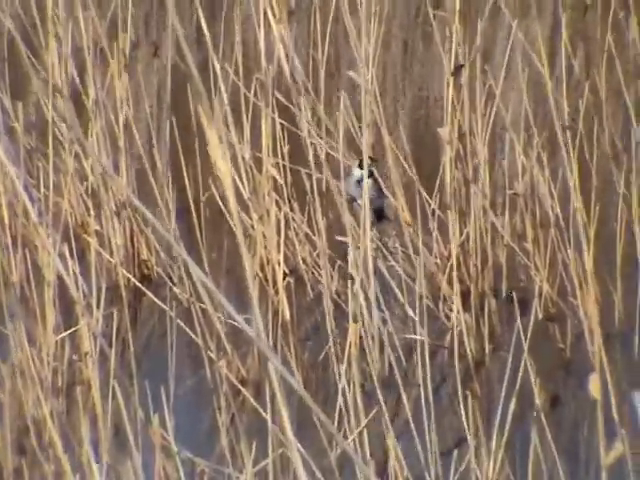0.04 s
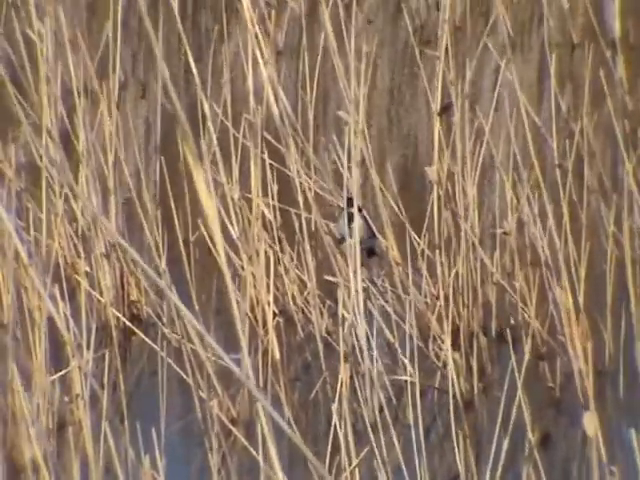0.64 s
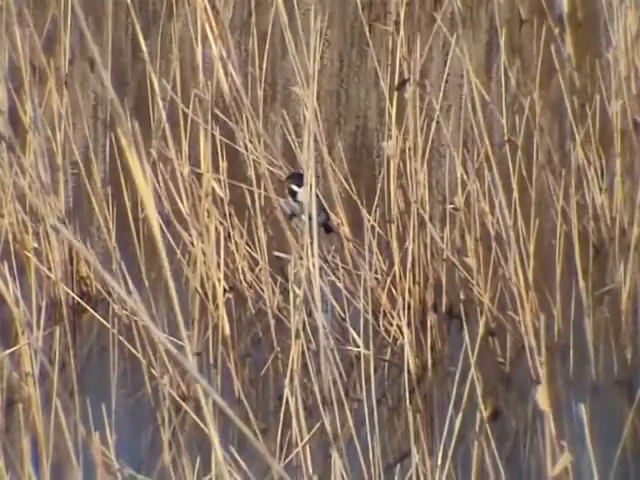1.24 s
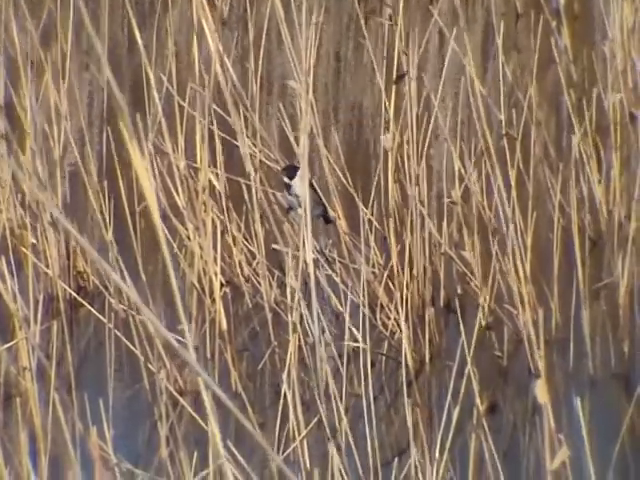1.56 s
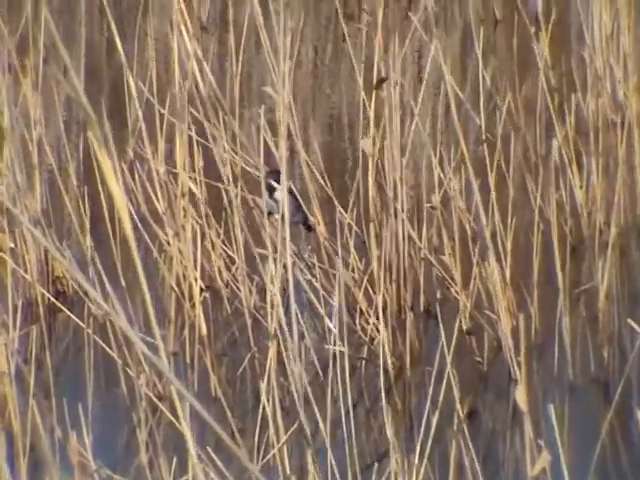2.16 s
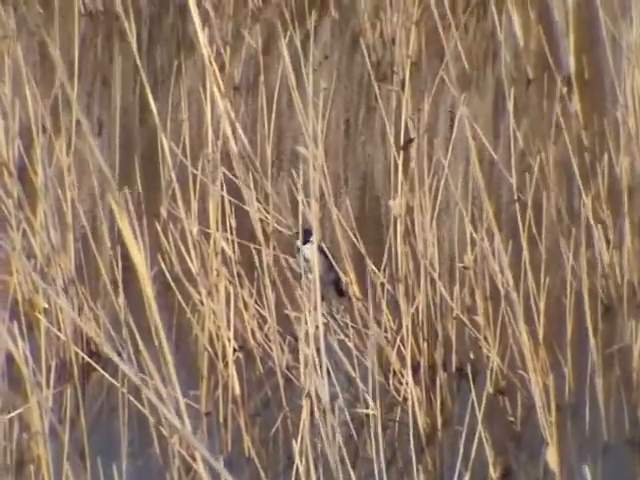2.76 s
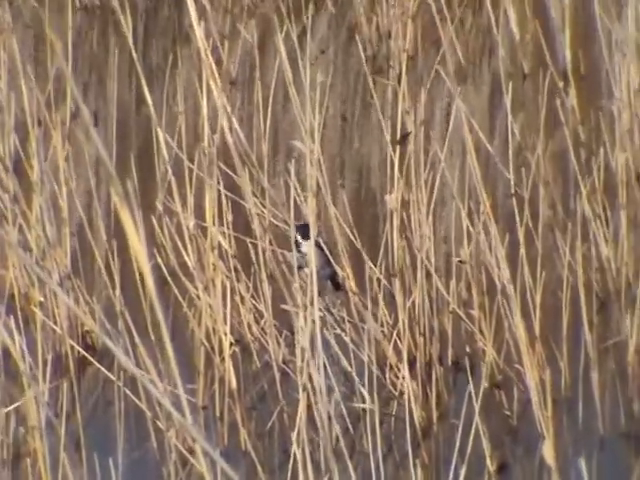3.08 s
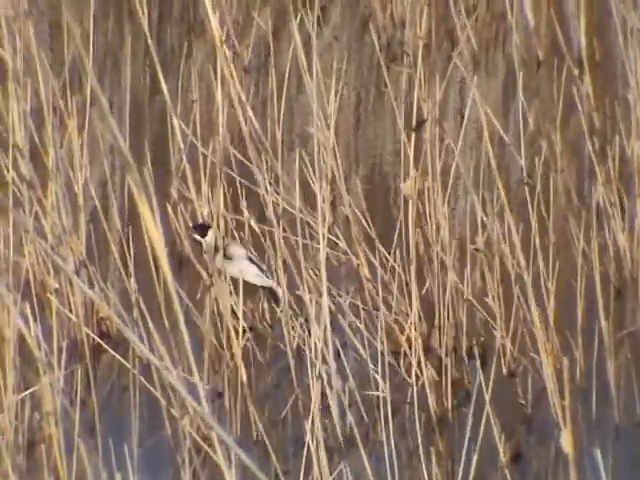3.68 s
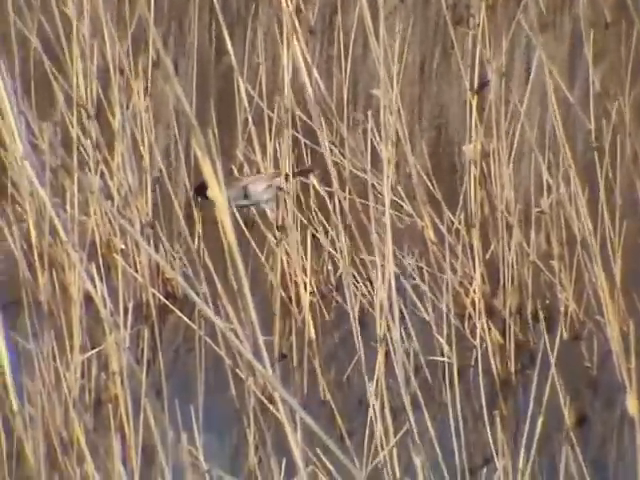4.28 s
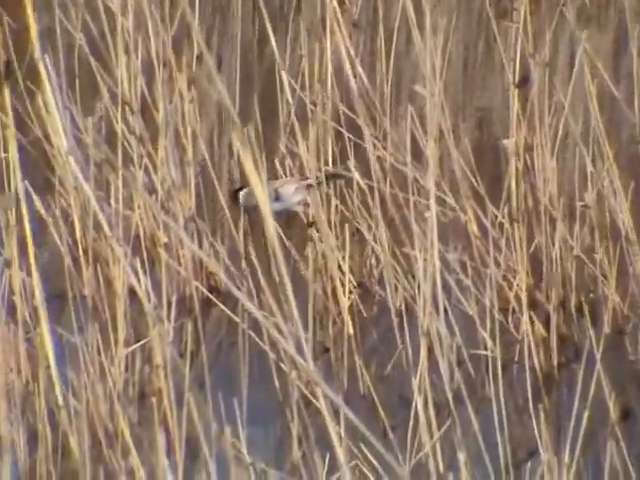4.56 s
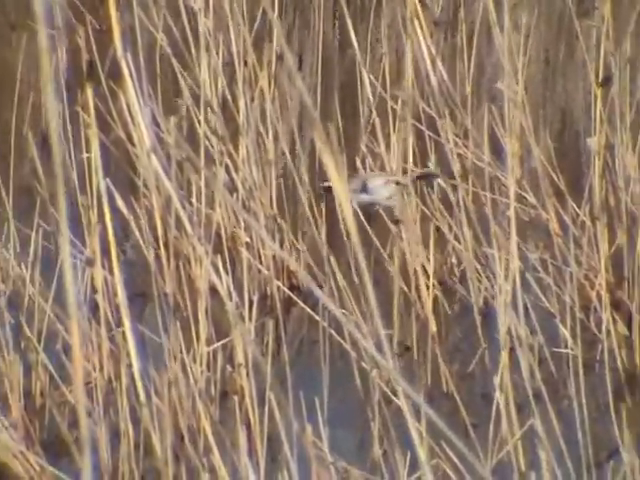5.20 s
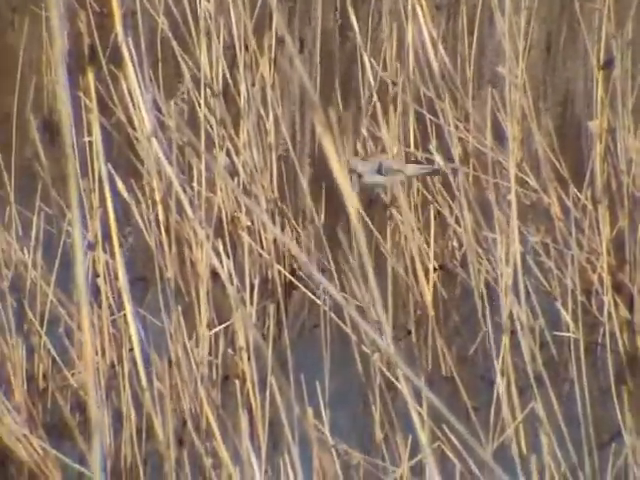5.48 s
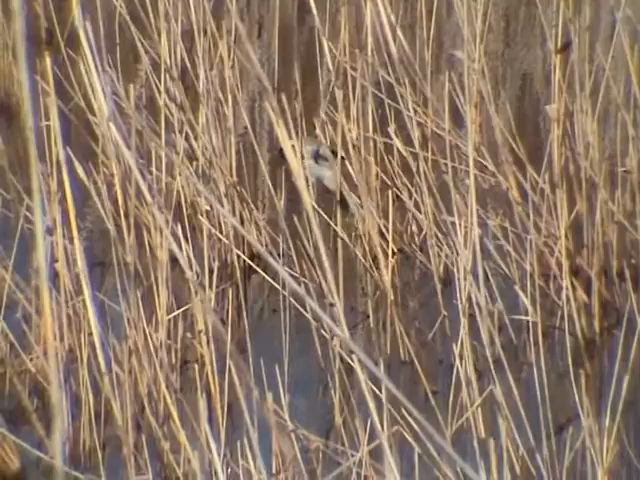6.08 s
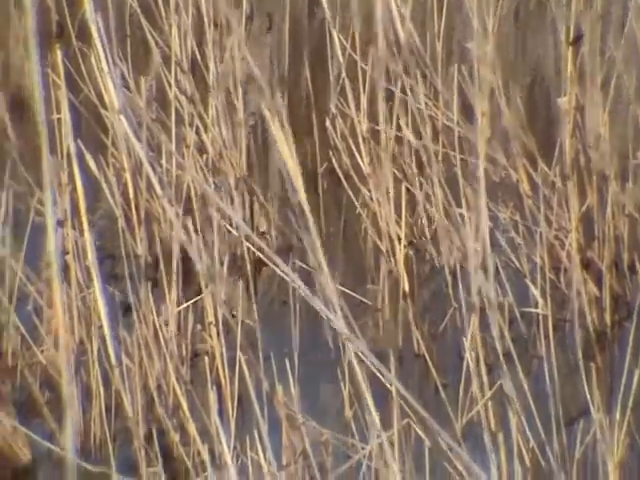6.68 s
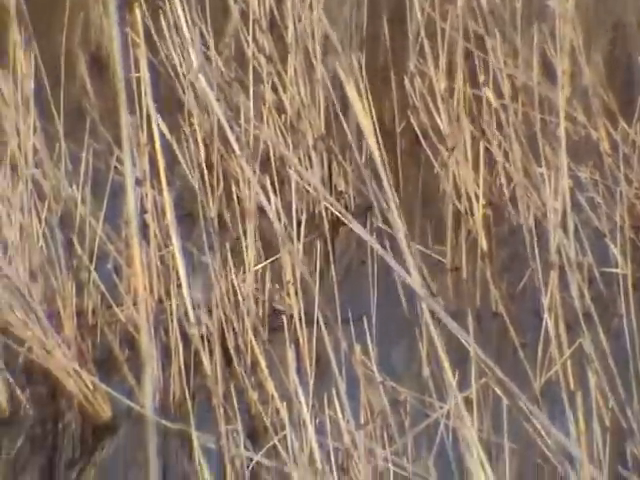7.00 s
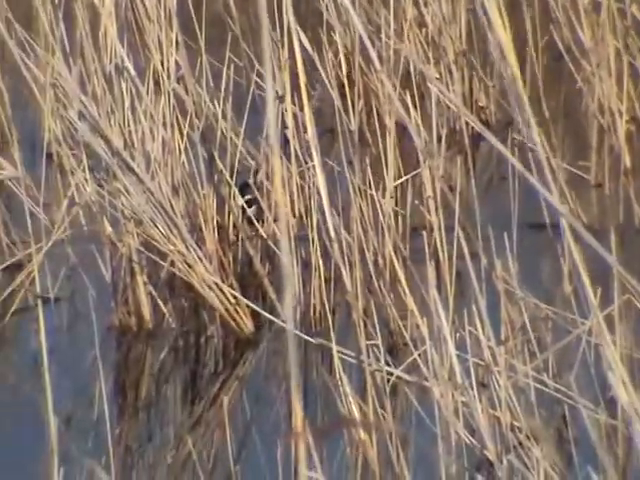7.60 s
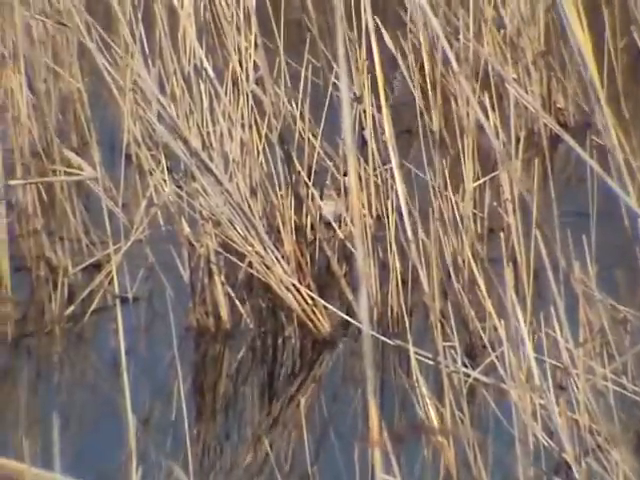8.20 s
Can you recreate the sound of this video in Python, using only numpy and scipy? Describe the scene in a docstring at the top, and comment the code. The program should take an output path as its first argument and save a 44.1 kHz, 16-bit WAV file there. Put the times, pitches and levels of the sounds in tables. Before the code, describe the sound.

Over a faint outdoor hush with a thin camera whine, a small bird in a reed bed sings one short phrase of quick, high, sliding chirps. Light gusts rumble on the microphone beneath it. After the song come a few soft handling ticks and faint dry rustles. Then the wind hits harder, buffeting the microphone with a deep rumble and small pops before it eases off.

```python
"""First comes a faint outdoor hush, with the hiss and thin whine of a camera. Then a small bird in
a reed bed sings one short phrase of thin, arched whistles, each a sliding tone echoed by the stems.
Gusts rumble on the microphone's openings, hardest after the song, and little swirls of air burst
there as pops. Now and then a sleeve swishes, the camera ticks in the hand and dry reeds rustle."""
import sys
import numpy as np
from scipy import signal
from scipy.io import wavfile
from scipy.ndimage import uniform_filter1d

SR = 44100
rng = np.random.default_rng(int(sys.argv[2]) if len(sys.argv) > 2 else 0)


def inscribe(sig):
    """Save sig as 16-bit PCM at rate SR to the path in sys.argv[1].

    A 1-D sig is mono; a 2-D sig holds one channel per row.
    Samples are clipped to [-1, 1] before scaling.
    """
    pcm = np.round(np.clip(np.atleast_2d(sig).T, -1, 1) * 32767)
    wavfile.write(sys.argv[1], SR, pcm.astype(np.int16))


N = 372644
TIME = np.arange(N) / SR

# "Pan" is left level minus right level. "Likeness" is 1 when both sides match, -1 when opposite.
# Each note slides to a turning point and on from it: (turn time [s], lead-in [s], lead-out [s],
# first pitch [Hz], turning pitch [Hz], last pitch [Hz], relative level [dB], turn roundness [0-1])
NOTES = [(.941, 0.0012, 0.011, 6260, 5960, 2100, -7, 0.5), (0.96, 0.009, 0.013, 2300, 3550, 2200, 2.5, .3),
         (1.006, 0.021, 0.012, 2240, 4100, 4030, 0, .4), (1.533, .018, 0.01, 3550, 3830, 4000, -19, .05),
         (1.647, .001, .008, 5800, 5750, 2300, -10, .4), (1.666, 0.0083, 0.013, 2280, 3580, 2010, 4, .3),
         (1.715, 0.028, 0.01, 1920, 3980, 4150, 3.5, 0.36),
         (1.834, 0.0011, 0.0088, 5800, 5760, 2300, -12, .4), (1.855, 0.013, 0.013, 2250, 3630, 2070, 2, .3),
         (1.901, 0.021, 0.012, 2180, 4140, 3800, 3, 0.7), (1.999, 0.018, 0.0117, 2160, 3600, 2200, 1, .35),
         (2.108, 0.021, 0.017, 5100, 7200, 5360, 2.5, 0.22),
         (2.124, 0.0019, 0.029, 5500, 5150, 1500, 2.5, 0.04),
         (2.269, 0.043, 0.035, 2160, 4550, 2020, 0, 0.18),
         (2.412, 0.022, 0.016, 6800, 7200, 4870, -0.5, 0.4), (2.437, 0.014, 0.024, 4980, 3800, 1520, 0, 0),
         (2.76, .022, .022, 2560, 2520, 2440, -9, .4), (3.324, 0.00079, .028, 9100, 9100, 7900, -2, .4)]
# The bird's throat rings near 4 kHz, so loudness follows pitch: (pitch [Hz], base level [dB])
THROAT = [(1500, -65), (2300, -57), (2850, -49), (3600, -48.5), (4100, -39.5), (4700, -43.5), (5400, -55),
          (6500, -49), (7300, -59), (9000, -57)]
# Where the bird sits between the ears: (pitch [Hz], pan [dB])
BIRD_PAN = [(2900, -3), (4000, -6), (7000, -2)]

# Gusts press on both microphone openings, sway between them and shed small swirls. A head-on gust
# has "bite": it is brighter. (peak time [s], rise [s], hold [s], fall [s], press [dB], sway [dB],
# swirls [dB], bite [dB per octave])
GUSTS = [(1.7, 0.046, 0.028, 0.091, -38, -26, -60, -8), (1.803, 0.077, 0.084, 0.077, -34, -26, -59.5, -3.5),
         (2.093, 0.057, 0.018, 0.063, -40.5, -34, -71, 1),
         (2.522, 0.035, 0.016, 0.085, -33, -25.5, -73, -7.5),
         (2.596, 0.034, 0.051, 0.1, -31, -28.5, -70, 2.7), (2.93, 0.043, 0.033, 0.14, -31, -31.5, -53.5, 1),
         (3.567, 0.037, 0.014, 0.057, -34, -32, -72, 0), (4.827, 0.11, 0.11, 0.27, -31.5, -28, -51.5, 0.5),
         (5.09, 0.1, 0.11, 0.093, -31.5, -31.5, -52.5, 2),
         (5.274, 0.065, 0.063, 0.11, -22, -34, -43.5, -0.5),
         (5.367, 0.04, 0.081, 0.13, -19.5, -31, -36.5, -0.5),
         (5.549, 0.12, 0.03, 0.064, -20.5, -31, -28.5, 5),
         (5.674, 0.092, 0.16, 0.088, -23.5, -35, -45, 0.5), (5.819, 0.15, 0.11, 0.017, -19, -34, -32.5, 0),
         (6.04, 0.25, 0.044, 0.17, -22.5, -32, -43, -0.2), (6.168, 0.13, 0.11, 0.21, -23, -34.5, -44, 1),
         (6.725, 0.12, 0.015, 0.045, -30.5, -39, -50, -1.5),
         (6.84, 0.039, 0.11, 0.15, -25.5, -36.5, -42.5, 0),
         (7.022, 0.079, 0.064, 0.057, -22, -33, -34.5, 4.5),
         (7.416, 0.031, 0.022, 0.33, -42.5, -54, -67, -2), (7.915, 0.2, 0.037, 0.087, -45.5, -51, -79, 3),
         (8.102, 0.09, 0.016, 0.071, -30, -33, -56, -2), (8.223, 0.1, 0.063, 0.15, -37, -38, -81, -1.5)]
# The light breeze between gusts: (time [s], sway [dB])
BREEZE = [(0, -75), (.5, -76), (.59, -42), (1, -45), (1.65, -43), (2.3, -46), (3.4, -81), (4.6, -51),
          (6.5, -60), (7.3, -96), (8.45, -58)]
# The wind's deep rumble: (frequency [Hz], relative level [dB])
RUMBLE = [(20, 1.5), (35, -1.5), (52, 5), (100, 2.5), (165, -0.5), (230, -8.5), (320, -16.5), (450, -29),
          (600, -28.5)]
# How closely press and sway move together: (frequency [Hz], likeness [-1 to 1])
SWAY_LIKENESS = [(40, 0.52), (150, 0.53), (400, 0.78)]
# The higher flutter of small swirls: (frequency [Hz], relative level [dB])
FLUTTER = [(280, 4.5), (400, -12.5), (600, -9), (900, -15), (1300, -26.5), (1900, -32.5), (2800, -42.5)]
# How alike the flutter is left and right: (frequency [Hz], likeness [-1 to 1])
FLUTTER_LIKENESS = [(290, 0.72), (640, -1), (1400, 0.023)]
# Swirls bursting on an opening: (time [s], relative peak [dB], ring [Hz], pan [dB])
POPS = [(0.619, -34.5, 353, 4), (1.111, -27, 196, 3), (2.634, -19, 172, 17), (2.651, -26, 297, 5),
        (2.678, -23, 252, -9), (2.932, -29, 270, 15), (2.954, -24, 168, 5), (3.232, -34, 60.6, 7),
        (3.584, -27.5, 124, 5), (3.789, -36, 54, 15), (4.14, -37, 224, 20), (5.105, -26.5, 850, 8),
        (5.275, -21, 380, 13), (5.301, -25, 477, 25), (5.334, -14, 150, 4), (5.372, -10.5, 302, 2),
        (5.47, -31, 850, 18), (5.503, -30, 750, 22), (5.521, -24, 1620, 10), (5.543, -23, 480, 16),
        (5.556, -26, 760, 11), (5.56, -7, 288, -2), (5.564, -20.5, 1160, 12), (5.576, -33, 1050, 10),
        (5.59, -25, 990, 10), (5.731, -17, 360, 15), (5.758, -16.5, 710, 10), (5.761, -24, 560, 10),
        (5.804, -16.5, 515, 23), (5.826, -15.5, 540, 17), (5.834, -28, 1050, 13), (5.88, -21, 805, 27.5),
        (5.926, -13, 396, 17), (5.932, -11.5, 335, 6), (5.973, -30.5, 594, 29), (6.06, -8, 142, -3),
        (6.123, -18.5, 805, 21), (6.288, -28.5, 696, 23), (6.305, -25, 416, 16), (6.422, -17, 100, 3),
        (6.713, -24.5, 400, 14), (6.852, -18, 128, 0), (6.903, -29, 545, 26), (7.044, -6.5, 189, -4),
        (7.064, -22, 820, 32), (7.085, -29, 720, 14), (7.122, -16, 190, 7), (8.113, -31.5, 320, 23)]

# Dry ticks of the camera in the hand: (time [s], peak [dB], decay [s])
TICKS = [(3.158, -38, .003), (3.913, -35.5, .004), (3.937, -41, .009)]
# How the camera's shell rings: (frequency [Hz], width [Hz], relative level [dB])
SHELL = [(400, 220, 0), (1020, 280, -4), (1900, 600, -16)]
# Rustles of dry stems and cloth: (time [s], length [s], centre [Hz], level [dB], pan [dB])
RUSTLES = [(0.618, 0.05, 586, -64, 15), (1.168, 0.15, 4000, -62.5, 9), (1.17, 0.19, 590, -59.5, 10),
           (1.399, 0.026, 420, -52.5, 7), (3.55, 0.028, 2400, -56.5, 9), (3.675, 0.023, 1900, -65, 2),
           (4.732, 0.027, 1660, -61.5, -8), (4.872, 0.024, 1870, -56.5, 4), (4.91, 0.15, 5130, -62, -2),
           (5.136, 0.0071, 2340, -57, 15), (6.838, 0.02, 2650, -56, 3)]
# A sleeve slides: (time [s], rate of passing cloth ribs [Hz], level [dB])
SLEEVE = [(1.32, 1100, -61), (1.34, 1497, -58), (1.36, 1950, -57), (1.38, 2193, -55), (1.41, 1990, -58),
          (1.445, 1340, -61)]

# Still air and microphone hiss: (frequency [Hz], relative level [dB])
HUSH = [(22, -12.5), (42, -22.5), (80, -26.5), (150, -15.5), (280, -16), (450, -18.5), (720, -20.5),
        (1050, -16.5), (1550, -22.5), (2800, -23.5), (3700, -26.5), (6300, -32.5), (8200, -32.5),
        (11000, -30), (13800, -43), (15500, -44)]
# How alike the hush is left and right: (frequency [Hz], likeness [-1 to 1])
HUSH_LIKENESS = [(60, 0.84), (290, 0.54), (640, 0.63), (1300, -0.7), (3100, 0.34), (6800, -0.54),
                 (15000, 0.96)]
# Which way the hush and hums lean: (frequency [Hz], pan [dB])
HUSH_PAN = [(60, 51.5), (200, -1), (700, 4.5), (1300, 1.5), (2400, 0.5), (8000, -1), (15000, 3)]
# The camera's noisy hums: (frequency [Hz], width [Hz], base level [dB])
HUMS = [(580.4, 5.8, -67.5), (895, 230, -63), (1154, 29, -76), (2676, 230, -70.5), (4860, 1740, -63.5),
        (6280, 450, -82)]
# The camera's thin tones: (frequency [Hz], relative level [dB])
WHINE = [(2170, -80), (2272, -74), (2503, -79), (2659, -75), (2842, -71.5), (3130, -81), (3400, -81),
         (4549, -78), (4657, -74), (4850, -80), (5115, -74), (5131, -72), (5324, -80), (6250, -71.5),
         (6455, -79), (9092, -79), (9442, -76), (9744, -81), (10767, -79.5)]
# Overtones of the camera's electronic switching: (frequency [Hz], base level [dB])
BUZZ_OVERTONES = [(3900, -88), (4200, -78), (4500, -72.5), (4800, -73), (5400, -79), (5700, -88),
                  (6000, -78.5), (6300, -78.5), (6600, -87), (8100, -85), (8700, -78), (9300, -76),
                  (9900, -88), (10500, -88), (10800, -76.5), (11700, -79), (12900, -77.5), (13800, -80.5),
                  (14400, -93)]
# That buzz swells twice: (time [s], relative level [dB])
BUZZ_SWELLS = [(0, -9), (.6, -9), (1.05, -3), (2.55, -1), (2.9, -7), (5.2, -9), (5.65, -0.5), (6.6, -0.5),
               (6.85, 1.5), (7.45, -7), (8.45, -9)]

SWITCHING_HZ, CUTOFF_HZ = 300, 15750


def bird(waver=0.0033, rasp_below_hz=3200, rasp_per_octave=0.09, dip_hz=3470, dip_width_hz=380):
    """A nearly pure whistle slides through each note, dipping at a narrow pitch gap in the sound path."""
    direct, wobble = np.zeros((2, N)), drift(245)
    song, rasp = np.zeros(N), drift(900)
    rise_s, fall_s = 0.002, 0.0022
    for s, lead_in_s, lead_out_s, first_hz, turn_hz, last_hz, note_db, roundness in NOTES:
        now = (TIME > s - lead_in_s) & (TIME < s + lead_out_s)
        t = TIME[now] - s
        pitch = glide(t, lead_in_s, lead_out_s, first_hz, turn_hz, last_hz, roundness)
        # the low ends of a note break up into a rasp
        roughness = rasp_per_octave * np.maximum(0, np.log2(rasp_below_hz / pitch))
        pitch = pitch * (1 + waver * wobble[now] + roughness * rasp[now])
        fade = np.clip(np.minimum((t + lead_in_s) / rise_s, (lead_out_s - t) / fall_s), 0, 1)
        dip = 1 - np.exp(-((pitch - dip_hz) / (dip_width_hz / 2)) ** 2)
        loudness = from_db(at_hz(THROAT, pitch) + note_db) * fade * dip
        whistle = loudness * np.sin(2 * np.pi * np.cumsum(pitch) / SR)
        song[now] += whistle
        direct[:, now] += panned(whistle, at_hz(BIRD_PAN, pitch))
    return direct + reed_echoes(song)


def glide(t, lead_in_s, lead_out_s, first_hz, turn_hz, last_hz, roundness):
    """A note's pitch slides evenly on either side of a rounded turn at t = 0."""
    progress = t / np.where(t < 0, lead_in_s, lead_out_s)
    bend = (np.hypot(progress, roundness) - roundness) / (np.hypot(1, roundness) - roundness)
    return turn_hz * (np.where(t < 0, first_hz, last_hz) / turn_hz) ** bend


def reed_echoes(song, echo_db=-9, decay_s=0.015, count=40):
    """The stems scatter many weak echoes, different ones to each side."""
    out = np.zeros((2, N))
    delays_s, signs = rng.uniform(0.005, 0.11, count), rng.choice([-1, 1], count)
    for k, (delay, sign) in enumerate(zip(delays_s, signs)):
        lag = int(delay * SR)
        out[k % 2, lag:] += sign * from_db(echo_db) * np.exp(-delay / decay_s) * song[:N - lag]
    return out


def wind(right_lag_s=0.00023):
    """Air tumbles over the microphone's openings, reaching the right one a little later."""
    press_db, sway_db, swirl_db, bite = airflow()
    left, right = rumble(press_db, sway_db, bite) + flutter(swirl_db)
    return np.array([left, np.interp(TIME - right_lag_s, TIME, right)])


def airflow(fade_db=15.5, swirl_speed=1.42, breeze_press_db=-54, breeze_bite=3):
    """Gusts swell, hold and die away over the breeze; gives press, sway, swirls and bite over time."""
    t = TIME[::50]
    s, rise, hold, fall, press_db, sway_db, swirl_db, gust_bite = np.transpose(GUSTS)[:, :, None]
    shape_db = -fade_db * np.maximum(0, np.maximum((s - t) / rise, (t - s - hold) / fall))
    gust_power, breeze_power = from_db(press_db + shape_db) ** 2, from_db(breeze_press_db) ** 2
    press = gust_power.sum(axis=0) + breeze_power
    breeze_sway = from_db(np.interp(t, *np.transpose(BREEZE))) ** 2
    sway = (from_db(sway_db + shape_db) ** 2).sum(axis=0) + breeze_sway
    # swirls come and go faster than their gust
    swirls = (from_db(swirl_db + swirl_speed * shape_db) ** 2).sum(axis=0) + 1e-12
    bite = ((gust_power * gust_bite).sum(axis=0) + breeze_power * breeze_bite) / press
    levels_db = 10 * np.log10([press, sway, swirls])
    return [np.interp(TIME, t, curve) for curve in (*levels_db, bite)]


def rumble(press_db, sway_db, bite, strong_db=-22, lumpy_db=2.5):
    """A stronger gust sheds smaller swirls, so its rumble is brighter as well as louder."""
    press_tilt = 0.33 * (press_db - strong_db) + bite   # dB per octave
    sway_tilt = 0.37 * (press_db - strong_db) + bite
    press, sway = 0, 0
    for hz, band in noise_bands(RUMBLE, SWAY_LIKENESS, 20.7, 608, count=12):
        press += band[0] * from_db(press_tilt * np.log2(np.clip(hz, 70, 400) / 70))
        sway += band[1] * from_db(sway_tilt * np.log2(max(hz, 45) / 45))
    lumps_db = lumpy_db * drift(35)
    press = steady(press) * from_db(press_db + lumps_db)
    sway = steady(sway) * from_db(sway_db + lumps_db)
    # the two add up on the left, which faces the wind, and partly cancel on the right
    return np.array([press + sway, press - sway])


def flutter(swirl_db, gain_db=1, strong_db=-22, ragged_db=7.5):
    """Small swirls come in ragged clumps and sound brighter when they are strong."""
    tilt = 0.3 * (swirl_db - strong_db)   # dB per octave
    bands = noise_bands(FLUTTER, FLUTTER_LIKENESS, 266, 3110, count=7)
    noise = sum(band * from_db(tilt * np.log2(hz / 400)) for hz, band in bands)
    clumps = rms_one(from_db(ragged_db * np.clip([drift(85), drift(76)], -2, 2)))
    return panned(noise * clumps * from_db(swirl_db + gain_db), pan_db=8.5)


def pops(gain_db=-6.5):
    """A bursting swirl is one kick of pressure that rings for about one cycle."""
    out, kick = np.zeros((2, N)), signal.unit_impulse(SR // 20)
    for s, peak_db, hz, pan_db in POPS:
        treble_cut = signal.butter(6, 1.253 * hz, fs=SR, output="sos")
        pulse = signal.sosfilt(treble_cut, resonate(kick, hz, width_hz=hz))
        pop = pulse / np.abs(pulse).max() * from_db(peak_db + gain_db) * rng.choice([-1, 1])
        at = int(s * SR)
        out[:, at:at + len(pop)] += panned(pop, pan_db)
    return out


def camera_ticks():
    """A tick is a sudden, short scuff that rings briefly in the camera's shell."""
    out, t = np.zeros((2, N)), TIME[:SR // 20]
    for s, peak_db, decay_s in TICKS:
        scuff = rng.standard_normal(len(t)) * np.exp(-t / decay_s)
        tick = sum(from_db(db) * rms_one(resonate(scuff, hz, width)) for hz, width, db in SHELL)
        at = int(s * SR)
        out[:, at:at + len(t)] += tick / np.abs(tick).max() * from_db(peak_db)
    return out


def rustles(width=0.45, grain_db=1.5):
    """Dry stems and cloth rub, making short swells of grainy noise."""
    out, friction = 0, rng.standard_normal(N) * from_db(grain_db * drift(130))
    for s, length_s, hz, level_db, pan_db in RUSTLES:
        scrape = rms_one(resonate(resonate(friction, hz, width * hz), hz, width * hz))
        swell = from_db(level_db) / (1 + (2 * (TIME - s) / length_s) ** 4)
        out += panned(scrape * swell, pan_db)
    return out


def sleeve(uneven=0.09, octave_below_db=-5, fade_s=0.019):
    """Ribs of cloth tick past unevenly, so the swish rises and falls with the arm's speed."""
    rate_hz, level_db = in_time(SLEEVE)
    phase = 2 * np.pi * np.cumsum(rate_hz * (1 + uneven * drift(670))) / SR
    ribs = np.sin(phase) + from_db(octave_below_db) * np.sin(phase / 2)
    swish = rms_one(ribs * drift(280))
    fade = np.clip(np.minimum(TIME - SLEEVE[0][0], SLEEVE[-1][0] - TIME) / fade_s + 0.5, 0, 1)
    return panned(swish * from_db(level_db) * fade, pan_db=13.5)


def background():
    """The camera's whine, its hums and the hiss all swell a little with its buzz."""
    buzz_db, = in_time(BUZZ_SWELLS)
    swell_db = 0.12 * (buzz_db - buzz_db.mean())
    return whine() * from_db(swell_db) + buzz(buzz_db) + hush(swell_db) + hums(swell_db)


def whine(gain_db=-0.5, waver_db=1.5, spread_db=3):
    """The camera's electronics give thin, steady tones, each wavering a little."""
    out, wobbles = np.zeros((2, N)), [drift(2.4) for _ in range(8)]
    for hz, tone_db in WHINE:
        for_phase, for_level = rng.choice(len(wobbles), size=2, replace=False)
        phase = 2 * np.pi * (hz * TIME + rng.random()) + 0.5 * wobbles[for_phase]
        side_shift = rng.normal(0, 0.041, (2, 1))
        gain = np.sqrt(2) * from_db(tone_db + gain_db + waver_db * wobbles[for_level])
        out += panned(gain * np.sin(phase + side_shift), rng.normal(0, spread_db))
    return out


def buzz(buzz_db, uneven_db=2):
    """The camera's switching gives a fine buzz of sharp, uneven ticks that swells and fades."""
    ticks = sum(np.sqrt(2) * from_db(at_hz(BUZZ_OVERTONES, hz)) * np.cos(2 * np.pi * hz * TIME)
                for hz in np.arange(BUZZ_OVERTONES[0][0], CUTOFF_HZ, SWITCHING_HZ))
    tick_number = np.round(TIME * SWITCHING_HZ).astype(int)
    strength = from_db(uneven_db * np.clip(rng.standard_normal(tick_number[-1] + 1), -2, 2))
    return panned(ticks * (strength / strength.mean())[tick_number] * from_db(buzz_db), pan_db=3)


def hums(swell_db):
    """The camera hums: noise that rings around a few pitches, mostly alike on both sides."""
    out, noise = 0, rng.standard_normal(N) + 0.57 * rng.standard_normal((2, N))
    for hz, width_hz, level_db in HUMS:
        gain = from_db(level_db + swell_db * min(hz / 5000, 1))
        out += panned(gain * rms_one(resonate(noise, hz, width_hz)), at_hz(HUSH_PAN, hz))
    return out


def hush(swell_db, base_db=-54.4, patchy_db=0.6):
    """Still air and microphone hiss make a soft noise whose bands each drift in level."""
    out = 0
    for hz, band in noise_bands(HUSH, HUSH_LIKENESS, 19.8, 16040, count=32):
        level_db = base_db + patchy_db * drift(3.5) + swell_db * min(hz / 10000, 1)
        out += panned(band, at_hz(HUSH_PAN, hz)) * from_db(level_db)
    return out


def from_db(db):
    """Turn decibels into a number to multiply by."""
    return 10 ** (np.asarray(db) / 20)


def rms_one(x):
    """Scale a signal so its average strength (rms) is 1."""
    return x / np.sqrt(np.mean(x ** 2) + 1e-20)


def steady(x):
    """Even out slow swings in loudness."""
    return x / np.sqrt(uniform_filter1d(x ** 2, size=2600) + 1e-12)


def in_time(rows):
    """Read a table's columns at every sample."""
    s, *columns = np.transpose(rows)
    return [np.interp(TIME, s, column) for column in columns]


def at_hz(rows, hz):
    """Read a table at any frequency, with octaves evenly spaced."""
    frequencies, values = np.transpose(rows)
    return np.interp(np.log(hz), np.log(frequencies), values)


def panned(x, pan_db):
    """Make the left side pan_db louder than the right."""
    return x * from_db(np.array([[0.5], [-0.5]]) * pan_db)


def drift(rate_hz):
    """A smooth random wander of about 1 either way."""
    r = np.exp(-40 * np.pi * rate_hz / SR)
    slow = signal.lfilter([1], [1, -2 * r, r * r], rng.standard_normal(N // 20 + 4002))[4000:]
    return np.interp(np.arange(N) / 20, np.arange(len(slow)), rms_one(slow))


def resonate(x, hz, width_hz):
    """Let a sound ring around one frequency; narrower rings longer."""
    r = np.exp(-np.pi * width_hz / SR)
    feedback = [1, -2 * r * np.cos(2 * np.pi * hz / SR), r * r]
    return signal.lfilter(np.array([1, 0, -1]) * (1 - r * r) / 2, feedback, x + 1e-18)


def noise_bands(spectrum, likeness, low_hz, high_hz, count):
    """Pairs of (centre [Hz], two-channel noise band); together the bands have strength 1."""
    edges = np.geomspace(low_hz, high_hz, count + 1)
    centres = np.sqrt(edges[1:] * edges[:-1])
    white, bands = rng.standard_normal((2, 2, N)), []
    for k, hz in enumerate(centres):
        band_filter = signal.butter(3, edges[k:k + 2], "band", fs=SR, output="sos")
        shared, opposed = signal.sosfilt(band_filter, white[k % 2])
        alike = at_hz(likeness, hz)
        pair = np.sqrt(1 + alike) * shared + np.sqrt(1 - alike) * opposed * [[1], [-1]]
        bands.append(from_db(at_hz(spectrum, hz)) * pair)
    scale = np.std(sum(bands))
    return [(hz, band / scale) for hz, band in zip(centres, bands)]


def scene():
    """Add up the bird, the wind, the small noises and the background."""
    return bird() + wind() + pops() + camera_ticks() + rustles() + sleeve() + background()


def record(dry):
    """Cut the deepest rumble and the highest treble."""
    dry = signal.sosfilt(signal.butter(2, 25, "high", fs=SR, output="sos"), dry)
    return signal.sosfilt(signal.ellip(12, 0.2, 80, CUTOFF_HZ, fs=SR, output="sos"), dry)


dry = scene()
out = record(dry)
inscribe(out)
```